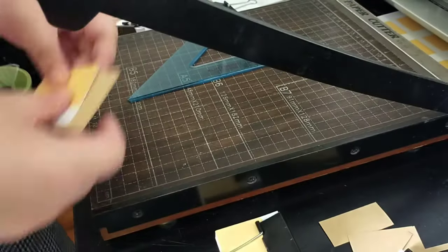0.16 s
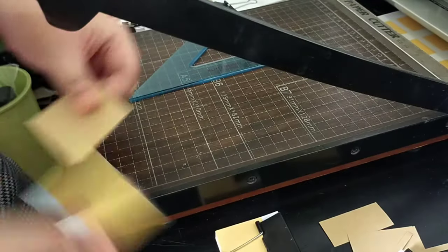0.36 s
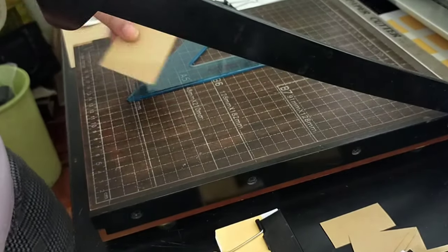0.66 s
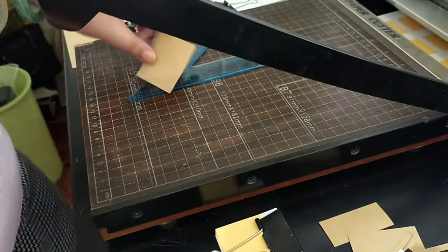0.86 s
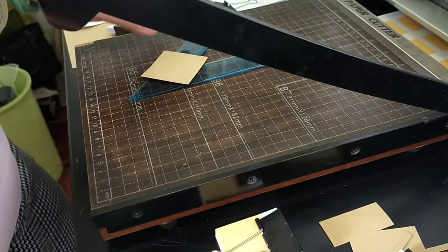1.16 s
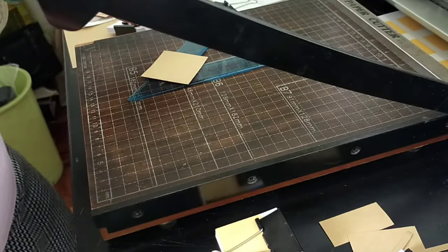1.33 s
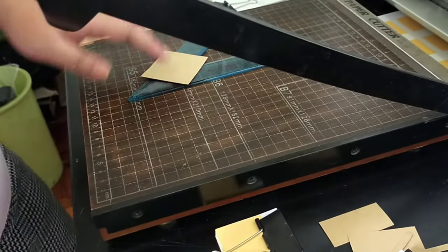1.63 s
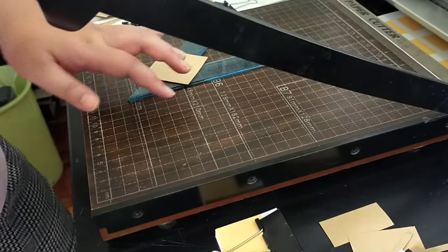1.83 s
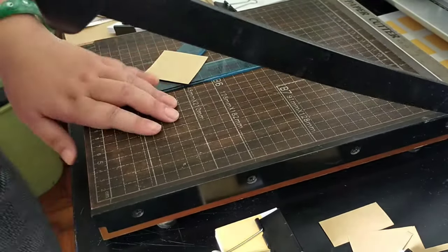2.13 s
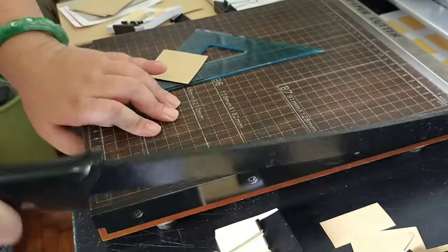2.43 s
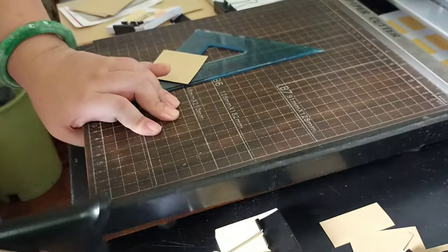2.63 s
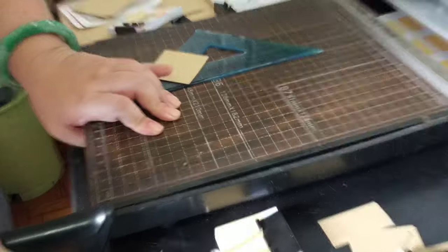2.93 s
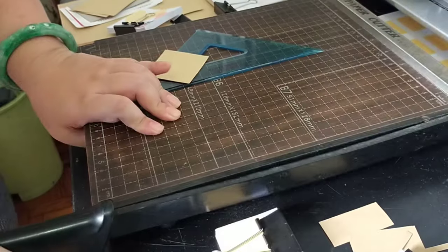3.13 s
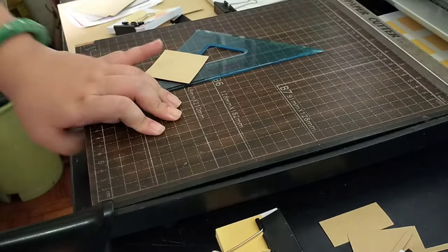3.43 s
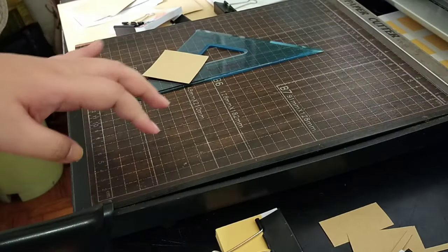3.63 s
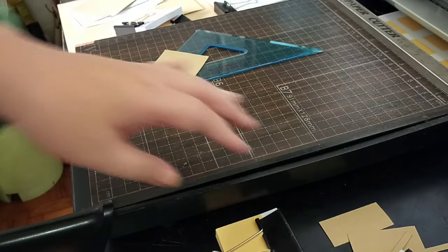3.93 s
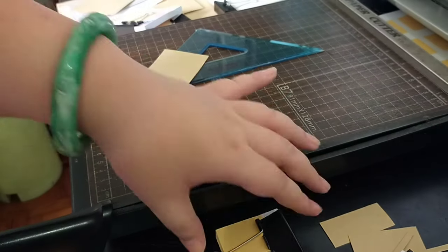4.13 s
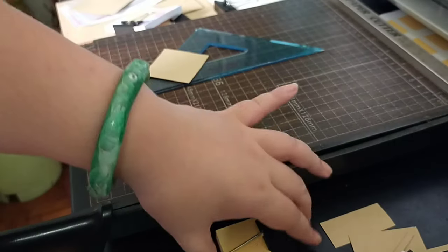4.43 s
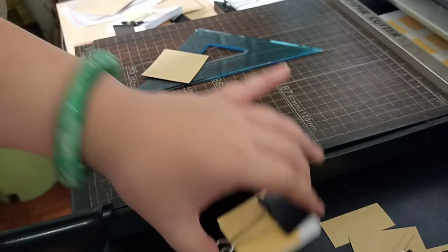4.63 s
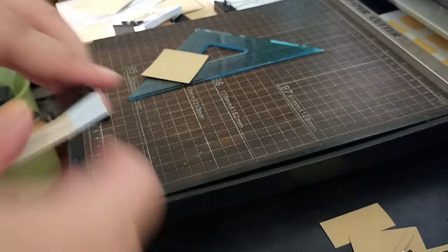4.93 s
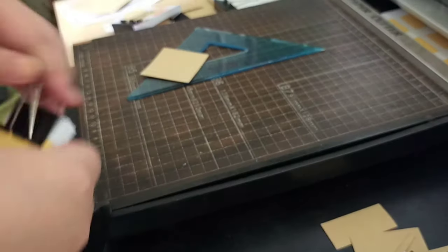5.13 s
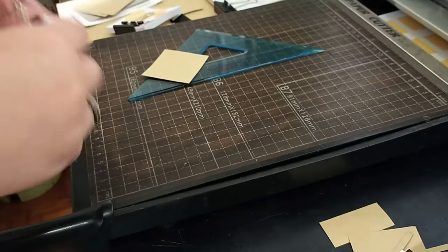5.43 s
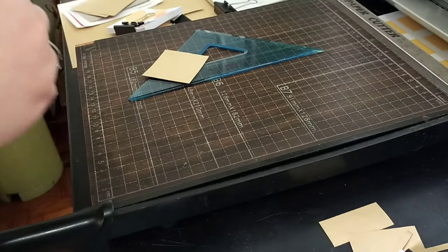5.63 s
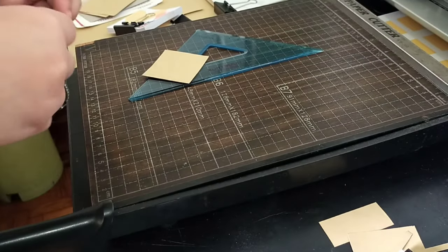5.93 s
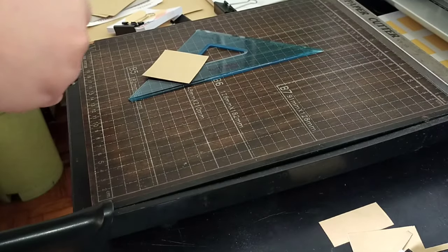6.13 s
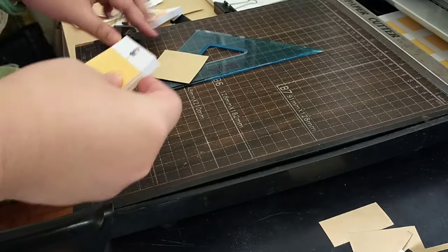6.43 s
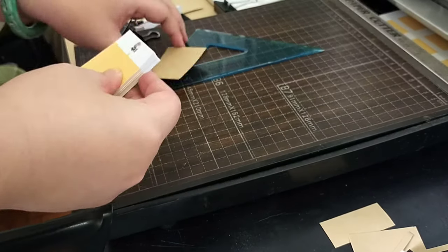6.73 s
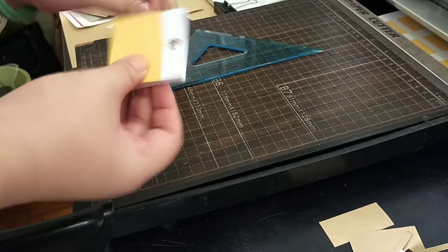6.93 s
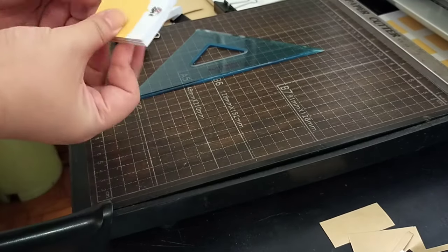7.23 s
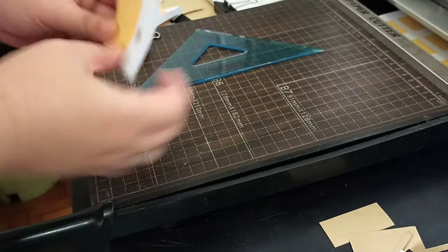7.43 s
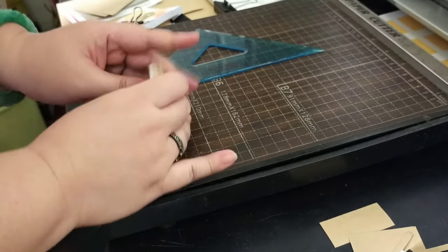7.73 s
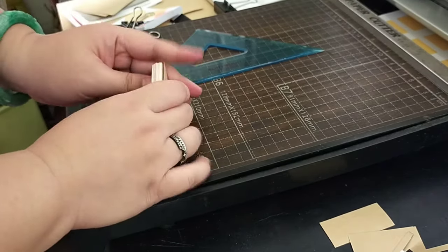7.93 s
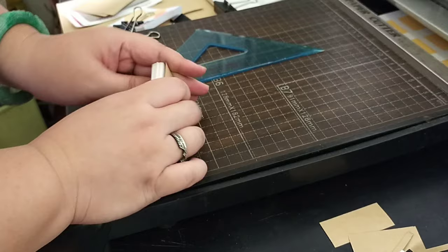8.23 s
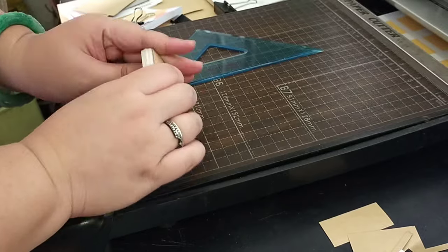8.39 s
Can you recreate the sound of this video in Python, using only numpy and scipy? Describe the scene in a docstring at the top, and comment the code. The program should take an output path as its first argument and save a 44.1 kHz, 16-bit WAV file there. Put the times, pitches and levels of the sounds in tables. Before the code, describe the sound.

Card hisses and ticks onto a guillotine paper cutter, its steel blade grinds, snaps and thumps down, then a metal clip clicks and drops.

```python
"""Card hisses through the fingers and ticks onto the board of a guillotine paper cutter, close by in a small workroom.
The steel blade then grinds down its counter-edge, snaps through and thumps on its stop.
A binder clip is taken off a small stack of cards and dropped, and the stack is tapped square.
Contacts are noisy cracks plus damped ringing modes, rubs are showers of stick-slip grains,
and steady air noise with a distant fan's drone lies underneath."""
import sys
import numpy as np
from scipy import signal
from scipy.fft import rfft, irfft
from scipy.io import wavfile

SR = 44100
rng = np.random.default_rng(int(sys.argv[2]) if len(sys.argv) > 2 else 0)


def store_pcm(level_fs):
    """Save levels as 16-bit WAV."""
    pcm = np.round(np.clip(level_fs, -1, 1) * 32767).astype(np.int16)
    wavfile.write(sys.argv[1], SR, np.atleast_2d(pcm).T)


N = 377496
TIME = np.arange(N) / SR
FADE_DB = 40  # depth from which a rub or rattle rises
CUTOFF_HZ = 16200  # corner of the final low-pass, and the highest resonance

# In all contact tables level_db is the level at 3 kHz; bass_db and treble_db are relative to it.
# The blade catching on the counter-edge: start_s, level_db, treble_db, pitch_hz (resonance of the contact point)
BLADE_CATCHES = [(2.3225, -22, 3.5, 15800), (2.3325, -18, -9, 14200), (2.443, -7.5, -9, 3560),
                 (2.449, -2.5, -12, 840), (2.4599, -11, -3.5, 3500), (2.5112, -18, 5, 3200),
                 (2.5301, -3.5, -4, 3510), (2.6365, -14.5, 6.5, 3320), (2.689, -17, 0, 3640),
                 (2.9111, -8.5, -12, 2560), (2.926, -9, -9.5, 2450), (2.9377, -8, -10, 1364)]
# The blade biting in and breaking through: start_s, level_db, bass_db, treble_db, crack_t60_s, pitch_hz
BLADE_CRUNCHES = [(2.3622, -7.5, 9.5, -5.5, 0.036, 5230), (2.385, -19.5, 18.5, -21, 0.21, 511),
                  (2.7269, 7, -5, -9.5, 0.03, 2580), (2.732, 1, -14, -8.5, 0.11, 3910),
                  (2.7502, 9, -10, -18.5, 0.083, 1340)]
# Steel grinding along steel, before the arm rings along: start_s, length_s, end_level_db, swell_db
BLADE_PUSHES = [(2.412, .058, -37.5, 13.5), (2.525, 0.092, -39.5, 5)]
# Relative colour of the grinding: pitch_hz, level_db
GRIND_COLOUR = [(150, -11), (500, -3), (1000, 6), (1700, 1.5), (2700, 8), (3600, -5), (5000, -7.5),
                (9000, -8), (15000, -22)]
# Ringing modes of the steel arm: pitch_hz, level_db (above the crack), t60_s
BLADE_MODES = [(500, 7, .1), (899, 9, .1), (1062, 8, .1), (1357, 10, .16), (1785, 6, .12), (2212, 6, .1),
               (2560, 6, .1), (2602, 6, .08), (3252, 8, .08), (3500, 7, .04), (4058, 8, .06),
               (5281, 5, .05), (9022, 6, .06), (12290, 6, .06)]
GRIND_RING_DB = 3  # the arm's modes singing along with the grinding


def blade():
    """The edge grinds along the counter-edge, and each catch sets the steel arm ringing."""
    pushes = [stroke(*row, attack_s=.045, release_s=0.025) for row in BLADE_PUSHES]
    grind = sum(friction(push, GRIND_COLOUR, slips_per_s=11000, uneven_db=4.5, q=7.7) for push in pushes)
    singing = sum(resonance(grind, hz, q=23) for hz, _, _ in BLADE_MODES)
    grind = grind + from_db(GRIND_RING_DB) * singing

    start_s, level_db, treble_db, pitch_hz = np.transpose(BLADE_CATCHES)
    hits = contacts(start_s, level_db, bass_db=-2.5, treble_db=treble_db, t60=0.0091, spot_hz=pitch_hz)
    hits = hits + BLADE_CRUNCHES
    catches = struck(hits, BLADE_MODES, bass_hz=680, treble_hz=6800, spot_db=18.5, spot_q=36.5)
    catches = highpass(catches, order=2, hz=250)
    return room(grind + catches, wet_db=-11.0)


# The hand landing on the board, the arm knocking it and meeting its stop: start_s, level_db, bass_db, pitch_hz
BOARD_BLOWS = [(2.1555, -16, 16.5, 1090), (2.1755, -26, 39.5, 403), (2.811, -12, 24, 136),
               (3.0, -6, 33, 820), (3.014, -14.5, 30.5, 138), (3.103, -28, 0, 785)]
# Ringing modes of the hollow base: pitch_hz, level_db (above the crack), t60_s
BOARD_MODES = [(137, 12, .19), (168, 12, .11), (214, 3, .17), (360, 4, .08), (481, 3, .16), (614, 6, .2),
               (750, 6, .12), (817, 11, .11), (885, 10, .08), (1632, 8, .16), (1790, 7, .18)]
# Relative colour of the rattling fittings: pitch_hz, level_db
RATTLE_COLOUR = [(300, 16), (900, -6), (2500, 6.5), (4500, -8.5), (15000, -17)]
BOARD_SHARE_DB = -46  # how much of a card or clip landing reaches the board
RATTLE_DB, RATTLE_RISE_S = -37.5, 0.01
RATTLE_END_S = 0.38  # time after the stop when the rattle is 60 dB down


def board():
    """The hollow base booms under blows and landings, weak below its lowest mode, and its loose fittings rattle."""
    start_s, level_db, bass_db, pitch_hz = np.transpose(BOARD_BLOWS)
    blows = contacts(start_s, level_db, bass_db, treble_db=-13, t60=0.024, spot_hz=pitch_hz)
    stop_s = start_s[np.argmax(level_db)]  # the loudest blow is the arm meeting its stop

    start_s, level_db = np.transpose([row[:2] for row in CARD_CONTACTS + CLIP_DROP])
    landings = contacts(start_s, level_db + BOARD_SHARE_DB, bass_db=33, treble_db=-13, t60=0.03, spot_hz=190)
    boom = struck(blows + landings, BOARD_MODES, bass_hz=126, treble_hz=7150, spot_db=17.5, spot_q=8.2)
    boom = highpass(boom, order=3, hz=104)

    shaking = [(stop_s, RATTLE_DB - FADE_DB),
               (stop_s + RATTLE_RISE_S, RATTLE_DB),
               (stop_s + RATTLE_END_S, RATTLE_DB - 60)]
    rattle = friction(shaking, RATTLE_COLOUR, slips_per_s=3800, uneven_db=7.0, q=15.0)
    return room(boom + rattle, wet_db=-8)


# The binder clip in the fingers: start_s, level_db, treble_db, pitch_hz, buzz_db (jaws, relative to the snap)
CLIP_SNAPS = [(5.1387, -13.5, -4.5, 4400, -2.5), (5.2331, -31, 4.5, 4660, -12), (5.8128, -13, 1, 5500, -9),
              (6.271, -30, -7, 4400, -18), (6.3247, -18, -4, 15100, -28)]
# Ringing modes of the falling clip, freely ringing: pitch_hz, level_db (above the crack), t60_s
CLIP_MODES = [(1314, 6, .12), (1720, 7, .03), (3930, 9, .06), (4230, 10, .07), (4344, 7, .13),
              (4495, 7, .09), (7200, 4, .02), (8250, 4, .04), (11610, 6, .02), (14400, 6, .03),
              (14520, 10, .17), (14580, 4, .12), (15200, 2, .02)]
BUZZ_DELAY_S, BUZZ_T60_S = .006, 0.15
HANDLE_HZ, JAW_HZ = 8020, 4400  # it lands on a wire handle, then on its jaws


def binder_clip():
    """Spring steel: bright snaps and a buzz of the jaws, damped by the fingers, then a freer ring as it falls."""
    held = np.array(CLIP_MODES) * [1, 1, .25] - [0, 4, 0]  # fingers: a quarter of the t60, 4 dB weaker
    start_s, level_db, treble_db, pitch_hz, buzz_db = np.transpose(CLIP_SNAPS)
    clicks = contacts(start_s, level_db, bass_db=-17, treble_db=treble_db, t60=0.014, spot_hz=pitch_hz)
    buzzes = contacts(start_s + BUZZ_DELAY_S, level_db + buzz_db, bass_db=-11, treble_db=0.0,
                      t60=BUZZ_T60_S, spot_hz=JAW_HZ)
    snaps = struck(clicks + buzzes, held, bass_hz=700, treble_hz=14300, spot_db=14.5, spot_q=15.0)
    drop = struck(bounces(), CLIP_MODES, bass_hz=716, treble_hz=9300, spot_db=9.5, spot_q=27.0)
    return room(snaps + drop, wet_db=-10.0)


CLIP_DROP = [(6.594, 8)]
BOUNCE_GAP_S, BOUNCE_KEEPS, BOUNCE_LOSS_DB = .0359, .8, 7.5  # first flight, share kept, loss per bounce
DROP_CRACK_S, CRACK_GROWTH = 0.011, 1.8  # crack t60 at first landing, and its growth per bounce


def bounces(count=3):
    """The falling clip's contacts: shorter flights, weaker blows and longer cracks at each bounce."""
    (start_s, level_db), = CLIP_DROP
    k = np.arange(count)
    flights = BOUNCE_GAP_S * BOUNCE_KEEPS ** k
    landing_s = start_s + np.cumsum(flights) - flights
    return contacts(landing_s, level_db - BOUNCE_LOSS_DB * k, bass_db=-14.5, treble_db=-7,
                    t60=DROP_CRACK_S * CRACK_GROWTH ** k, spot_hz=np.where(k == 0, HANDLE_HZ, JAW_HZ))


# Card edges and fingertips: start_s, level_db, treble_db, crack_t60_s
CARD_CONTACTS = [(0.6502, -11.5, -15, 0.023), (0.7033, -6.5, -55, 0.014), (1.0032, -15, -1, 0.028),
                 (1.0153, -19, -1, 0.012), (1.655, -41.5, 12, 0.017), (4.5631, -17.5, -41, 0.044),
                 (6.4689, -0.5, -25, 0.012), (6.4811, 7, -30.5, .015), (7.7487, -20, -9, .05),
                 (7.802, -22.5, -6.5, 0.018), (8.2076, -1.5, -40, 0.0054), (8.2268, -43.5, 19.5, 0.014),
                 (8.5418, -17, -11, 0.016)]
# Ringing modes of the card: pitch_hz, level_db (above the crack), t60_s
CARD_MODES = [(548, 11.5, 0.095), (1295, 11.8, 0.068), (1727, 11, 0.09), (2620, 2, 0.14), (3630, 0.97, 0.1)]
# Two soft, dull knocks on the cutting mat: start_s, level_db, bass_db, crack_t60_s, pitch_hz
SOFT_KNOCKS = [(3.485, -34, 18.5, .03, 620), (8.5249, -10, 16, .035, 1380)]
# Ringing modes of the soft knocks: pitch_hz, level_db (above the crack), t60_s
KNOCK_MODES = [(608, 19.4, 0.13), (980, 14, 0.19), (1270, 7.5, 0.018), (1754, 14.4, 0.04),
               (2610, 12.7, 0.035)]
# Card sliding over card and skin: start_s, length_s, end_level_db
CARD_SLIDES = [(0.279, 0.078, -55.5), (0.386, 0.044, -52), (0.494, 0.016, -59.5), (0.604, .10, -55.5)]
# Relative colour of the sliding: pitch_hz, level_db
SLIDE_COLOUR = [(500, -26), (2000, 9.5), (5000, 3.5), (9000, 5.5), (14000, 9.5)]
# The palm brushing the board, and cards shifting in the stack: start_s, length_s, end_level_db
SCUFFS = [(2.135, 0.053, -53), (8.189, 0.018, -49)]
# Relative colour of the scuffs: pitch_hz, level_db
SCUFF_COLOUR = [(150, -48), (700, 17), (2000, 7), (4000, 1), (7000, -17), (15000, -45)]
SLIDE_SWELL_DB = 11.5


def cards():
    """Dry ticks, soft knocks, and the stick-slip hiss of card and skin sliding."""
    start_s, level_db, treble_db, crack_t60_s = np.transpose(CARD_CONTACTS)
    edges = contacts(start_s, level_db, bass_db=-9.5, treble_db=treble_db, t60=crack_t60_s, spot_hz=2600)
    ticks = struck(edges, CARD_MODES, bass_hz=695, treble_hz=10700, spot_db=-13.5, spot_q=2.7)

    start_s, level_db, bass_db, crack_t60_s, pitch_hz = np.transpose(SOFT_KNOCKS)
    taps = contacts(start_s, level_db, bass_db, treble_db=-16, t60=crack_t60_s, spot_hz=pitch_hz)
    knocks = struck(taps, KNOCK_MODES, bass_hz=706, treble_hz=8000, spot_db=9.0, spot_q=17.0)
    knocks = highpass(knocks, order=4, hz=450)

    slide_strokes = [stroke(*row, SLIDE_SWELL_DB, attack_s=.08, release_s=0.056) for row in CARD_SLIDES]
    slide = sum(friction(curve, SLIDE_COLOUR, slips_per_s=26000, uneven_db=1.5, q=5.3)
                for curve in slide_strokes)
    # a negative swell: scuffs start strongest and ease off
    scuff_strokes = [stroke(*row, swell_db=-6.5, attack_s=0.01, release_s=0.091) for row in SCUFFS]
    scuffs = sum(friction(curve, SCUFF_COLOUR, slips_per_s=16000, uneven_db=16.0, q=30)
                 for curve in scuff_strokes)
    return room(ticks + knocks + slide + scuffs, wet_db=-11.5)


# Relative colour of the room air: pitch_hz, level_db (per Hz)
AIR_COLOUR = [(20, 12), (60, 4), (95, 6), (140, 0), (250, 0.5), (420, -4), (620, -0.5), (1000, -3.5),
              (1600, -4.5), (2600, -9), (4200, -17), (7000, -19), (15000, -21)]


def background():
    """Steady air noise and the drone of a distant fan, made of narrow noise bands."""
    air = from_db(-57) * rms_one(coloured(rng.standard_normal(N), AIR_COLOUR))
    low_drone = drone(hz=96.3, width_hz=11.6, db=-55.5)
    upper_drones = drone(hz=581.0, width_hz=4.7, db=-72) + drone(hz=671, width_hz=3.4, db=-75.0)
    return air + low_drone + upper_drones


def drone(hz, width_hz, db):
    """Noise in one narrow two-pole resonance."""
    radius = np.exp(-np.pi * width_hz / SR)
    poles = [1, -2 * radius * np.cos(2 * np.pi * hz / SR), radius * radius]
    noise = rng.standard_normal(N + SR)
    settled = signal.lfilter([1, 0, -1], poles, noise)[SR:]  # skip the build-up
    return from_db(db) * rms_one(settled)


# Decay of the room's echoes: pitch_hz, t60_s
ROOM_T60 = [(100, 0.29), (500, 0.26), (2000, 0.19), (8000, 0.2), (16000, 0.19)]


def room(x, wet_db, build_s=0.0042):
    """Echoes off the desk and walls build up in a few ms and die band by band."""
    t, tail = TIME[:SR // 2], 0
    edges = np.geomspace(40, 18000, 9)
    for low, high in zip(edges, edges[1:]):
        bandpass = signal.butter(2, [low, high], "band", fs=SR, output="sos")
        band = signal.sosfilt(bandpass, rng.standard_normal(len(t)))
        t60 = at_hz(ROOM_T60, np.sqrt(low * high))
        tail = tail + band * from_db(-60 * t / t60)
    tail = tail * (1 - np.exp(-(t / build_s) ** 2))
    echoes = signal.fftconvolve(x, tail / np.linalg.norm(tail))[:N]
    return x + from_db(wet_db) * echoes


def contacts(s, db, bass_db, treble_db, t60, spot_hz):
    """One row per contact; a single value is shared by all of them."""
    return list(np.broadcast(s, db, bass_db, treble_db, t60, spot_hz))


def struck(hits, modes, bass_hz, treble_hz, spot_db, spot_q):
    """Each contact is a crack plus the body's modes; hardness tilts the spectrum, the touched spot colours it."""
    out, t = np.zeros(N + SR), TIME[:SR // 3]
    for s, db, bass_db, treble_db, t60, spot_hz in hits:
        tilt = [(bass_hz, bass_db), (3000, 0), (treble_hz, treble_db)]  # pivots at 3 kHz
        burst = crack(t60, t)
        burst = burst + from_db(spot_db) * resonance(burst, spot_hz, spot_q)
        blow = coloured(burst + ringing(modes, t), tilt)
        start = round(s * SR)
        out[start:start + len(t)] += from_db(db) * blow
    return out[:N]


FORCE_HZ = 400  # below: one clean push; above: ragged micro-contacts


def crack(t60, t):
    """One push of force in the bass; above it a ragged burst of micro-contacts whose fade t60 sets."""
    fade = from_db(-60 * t / max(t60, .002)) * (1 - np.exp(-t / .0007)) + 1e-18
    spectrum = rfft(rng.standard_normal(len(t)) * fade)
    evened = spectrum / np.sqrt(np.abs(spectrum) + 1e-12)  # halves the spectrum's unevenness in dB
    burst = irfft(evened, len(t)) * fade ** .1
    push = signal.lfilter(*signal.butter(2, FORCE_HZ, fs=SR), signal.unit_impulse(len(t)) + 1e-18)
    ragged = signal.lfilter(*signal.butter(2, FORCE_HZ, "high", fs=SR), burst / np.linalg.norm(burst))
    return push + ragged


def ringing(modes, t):
    """Damped sines; each blow excites every mode with a strength of its own."""
    hz, db, t60 = np.transpose(modes)[:, :, None]
    damping = np.log(1000) / t60
    strength = from_db(db + 2 * rng.standard_normal(db.shape))
    height = strength * 2 * damping / SR  # sets the height of the spectral peak
    return np.sum(height * np.exp(-damping * t) * np.sin(2 * np.pi * hz * t), axis=0)


def stroke(start, length, db, swell_db, attack_s, release_s):
    """Level of one rub, as (s, dB): it takes hold, swells (or eases, if negative) with pressure, and lets go."""
    end = start + length
    return [(start - attack_s, db - swell_db - FADE_DB),
            (start, db - swell_db),
            (end, db),
            (end + release_s, db - FADE_DB)]


def friction(curve, colour, slips_per_s, uneven_db, q, count=28):
    """Stick-slip grains of uneven size under a level curve, each ringing briefly at one of count pitches."""
    s, db = np.transpose(curve)
    out, t = np.zeros(N), TIME[(TIME >= s[0]) & (TIME < s[-1])]
    grain_rng = np.random.default_rng(rng.integers(2 ** 31))
    chance, size, sign, pitch = grain_rng.random((len(t), 4)).T
    height = from_db(-abs(uneven_db) * np.log(size + .02))
    slips = (chance < slips_per_s / SR) * height * np.sign(sign - .5)
    pitches = np.geomspace(400, 15000, count)
    choice = np.floor(pitch * count)
    grains = sum(resonance(slips * (choice == k), hz, q) for k, hz in enumerate(pitches))
    rub = rms_one(coloured(grains, colour)) * from_db(np.interp(t, s, db))
    out[np.searchsorted(TIME, s[0]):][:len(t)] = rub
    return out


def resonance(x, hz, q):
    """One resonance with gain 1 on top."""
    return signal.lfilter(*signal.iirpeak(min(hz, CUTOFF_HZ), max(q, 1), fs=SR), x + 1e-18)


def highpass(x, order, hz):
    """Butterworth cut of the bass a body cannot radiate well."""
    return signal.sosfilt(signal.butter(order, hz, "high", fs=SR, output="sos"), x)


def coloured(x, points):
    """Causal (minimum-phase) filter that follows (Hz, dB) points."""
    size = 2 ** 13
    gain = from_db(at_hz(points, np.fft.rfftfreq(size, 1 / SR)))
    cepstrum = irfft(np.log(gain))
    cepstrum[1:size // 2] *= 2  # fold onto positive time
    cepstrum[size // 2 + 1:] = 0
    impulse = irfft(np.exp(rfft(cepstrum)))[:size // 2]
    return signal.oaconvolve(x, impulse)[:len(x)]


def at_hz(points, hz):
    """Read a table on a log-frequency axis."""
    f, value = np.transpose(points)
    return np.interp(np.log(hz + 1), np.log(f), value)


def from_db(db):
    """Decibels to amplitude."""
    return 10 ** (np.asarray(db) / 20)


def rms_one(x):
    """Scale to an RMS of one."""
    return x / np.sqrt(np.mean(x ** 2) + 1e-20)


def scene():
    """All layers together, as one channel."""
    return (blade() + board() + binder_clip() + cards() + background())[None]


# Treble resonances of the small microphone: pitch_hz, level_db
MICROPHONE = [(1000, 1), (6300, -2), (8000, 6.5), (9500, -3), (12500, 2.5), (14800, 13), (16000, -5)]


def record(dry):
    """The small microphone's resonances colour the treble; a steep low-pass cuts the top."""
    heard = coloured(dry[0], MICROPHONE)
    return signal.sosfilt(signal.ellip(10, .2, 70, CUTOFF_HZ, fs=SR, output="sos"), heard)[None]


dry = scene()
out = record(dry)
store_pcm(out)
```